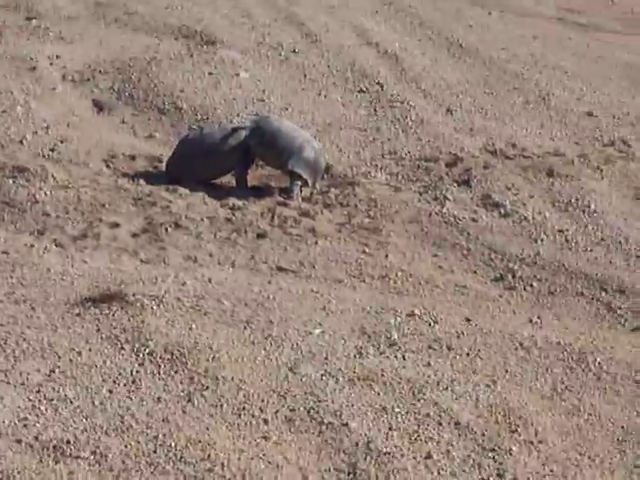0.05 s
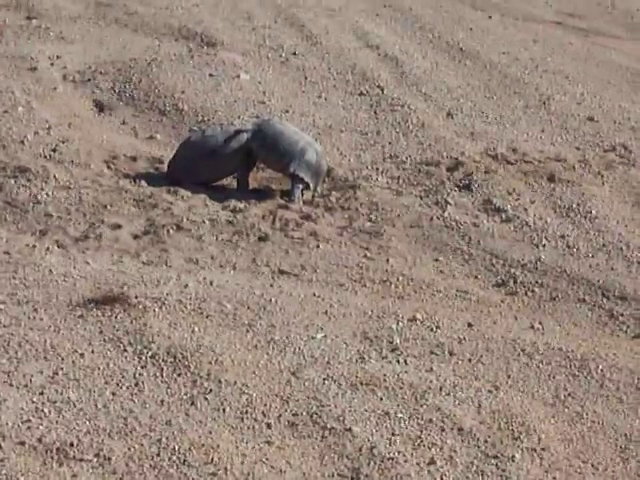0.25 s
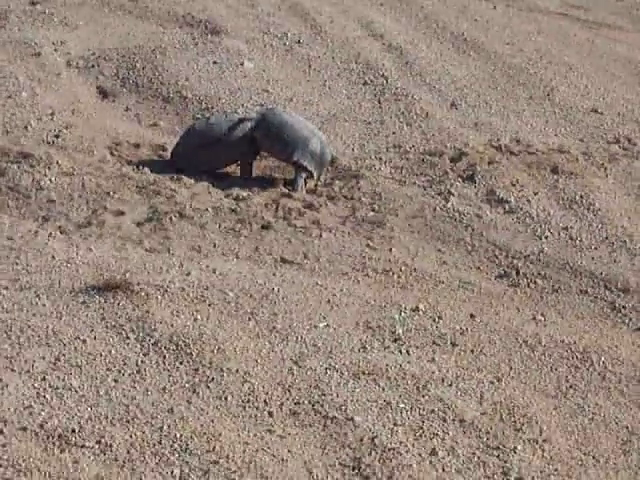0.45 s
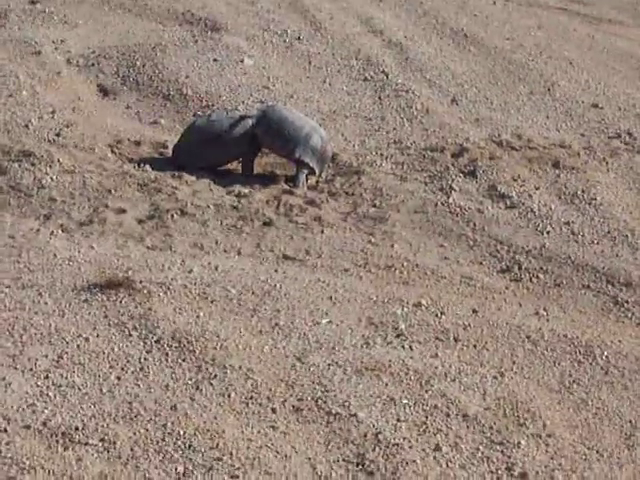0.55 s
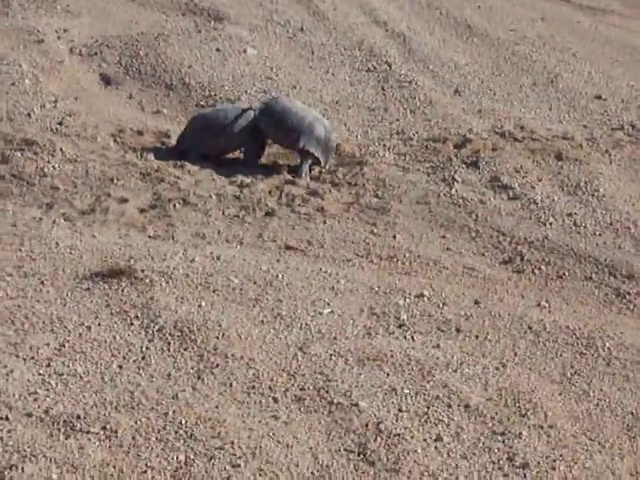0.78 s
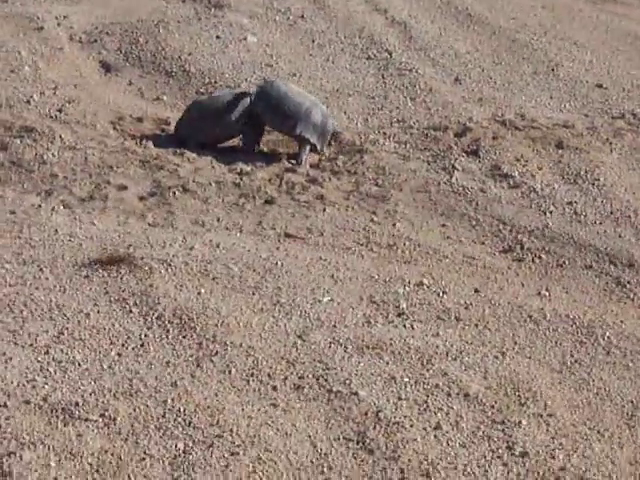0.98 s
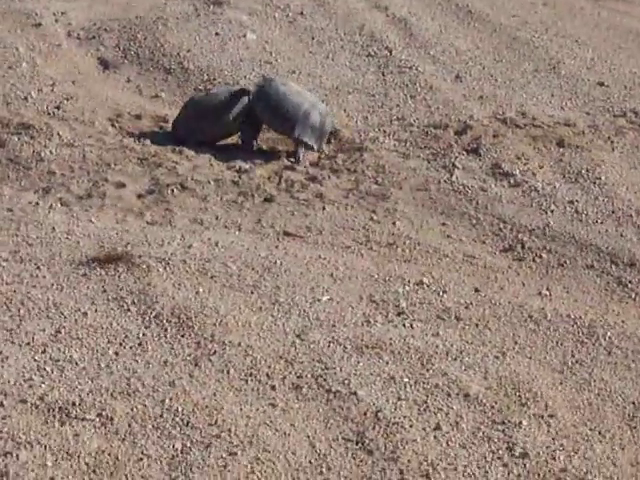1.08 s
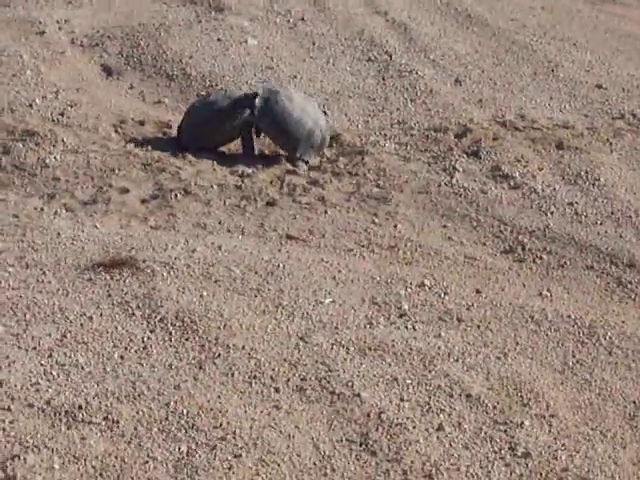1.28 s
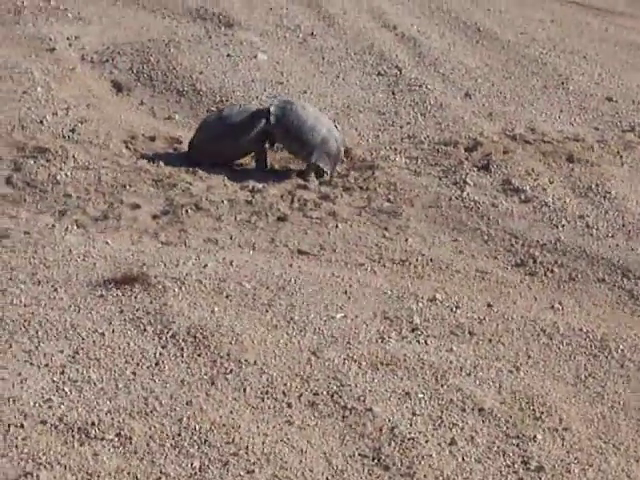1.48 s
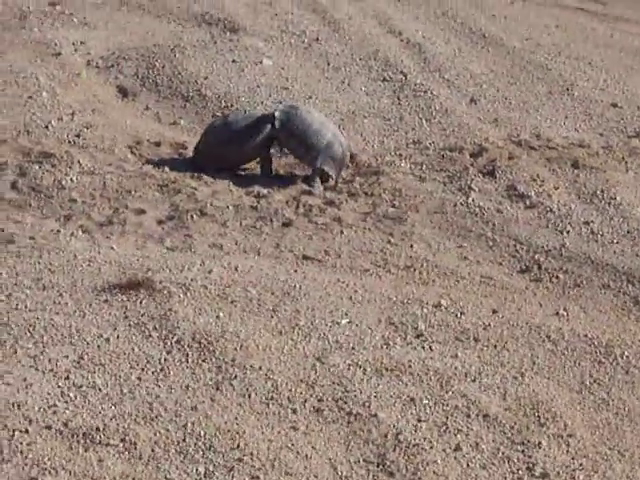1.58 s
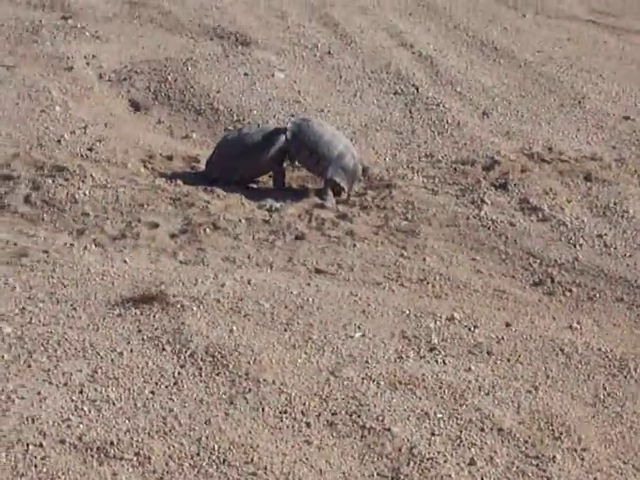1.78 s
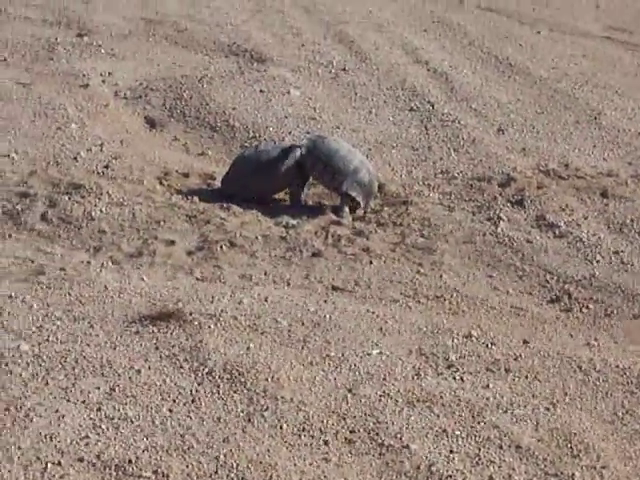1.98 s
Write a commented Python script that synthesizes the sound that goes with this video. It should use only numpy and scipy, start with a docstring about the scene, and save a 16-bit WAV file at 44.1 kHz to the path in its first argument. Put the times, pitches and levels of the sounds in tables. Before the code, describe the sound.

Gusty wind rumbles and thumps over faint scrapes of two tortoises shoving each other.

```python
"""On a patch of gravel in the wind, two tortoises shove each other. Their feet make soft, gritty scuffs,
pebbles knock and grit ticks. Then comes a quick run of dry, hollow scrapes as hard surfaces catch and slide.
Gusts buffet the microphone, and single eddies (small swirls of air) thump through the strongest, one with a
sharp crack. Under it lie a thin hiss and the camera's faint whine."""
import sys
import numpy as np
from scipy import signal
from scipy.fft import rfft, irfft, next_fast_len
from scipy.io import wavfile
from scipy.ndimage import uniform_filter1d

SR = 44100
rng = np.random.default_rng(int(sys.argv[2]) if len(sys.argv) > 2 else 0)


def wrap_up_sound(samples):
    """Save the sound to the file named by the first command line argument, as 16-bit audio."""
    columns = np.atleast_2d(samples).T
    # keep every value between -1 and 1, then stretch to whole-number steps
    tamed = np.clip(columns, -1, 1)
    steps = np.round(tamed * 32767).astype(np.int16)
    wavfile.write(sys.argv[1], SR, steps)


N = 90404
FFT_SIZE = next_fast_len(N + SR // 2)


def amp(db):
    """Turn decibels into a number to multiply by."""
    return 10 ** (np.asarray(db) / 20)


def unit(x):
    """Scale a sound to an average (rms) level of 1."""
    return x / np.sqrt(np.mean(x ** 2) + 1e-20)


def clock():
    """The time of each sample, in seconds."""
    return np.arange(N) / SR


def loudness(rows):
    """Join (time_s, level_db) points into a volume curve."""
    return amp(np.interp(clock(), *np.transpose(rows)))


def filtered(x, gain_at):
    """Turn each frequency up or down by gain_at(hz)."""
    hz = np.fft.rfftfreq(FFT_SIZE, 1 / SR)
    return irfft(rfft(x, FFT_SIZE) * gain_at(hz), FFT_SIZE)[:N]


def coloured(x, tone):
    """Give a sound the tone of a (pitch_hz, level_db) table, at level 1."""
    pitch_hz, level_db = np.transpose(tone)
    return unit(filtered(x, lambda hz: amp(np.interp(np.log(hz + 1), np.log(pitch_hz + 1), level_db))))


def noise(tone):
    """Noise with the given tone, at level 1."""
    return coloured(rng.standard_normal(N), tone)


def steady(x, samples):
    """Even out swells that last longer than about this many samples."""
    power = np.abs(signal.hilbert(x)) ** 2
    slow_power = uniform_filter1d(uniform_filter1d(power, samples), samples)
    return unit(x / np.sqrt(np.abs(slow_power) + 1e-9))


def grains(per_s, scatter_db):
    """Tiny hits at random times and of random sizes."""
    hits = rng.random(N) < per_s / SR
    direction = np.sign(rng.standard_normal(N))
    return unit(hits * direction * amp(scatter_db * rng.standard_normal(N)))


def clicks(events, tone, decay_s):
    """Bursts of noise that start sharply and die at once."""
    t = clock()
    strength = sum(amp(db) * (t >= s) * np.exp(-np.abs(t - s) / decay_s) for s, db in events)
    return strength * steady(noise(tone), samples=60)


# How loud the hiss is: time_s, level_db
HISS_LOUDNESS = [(0, -54.5), (0.35, -54.5), (0.6, -53.5), (0.85, -54.5), (0.96, -56.5), (1.15, -56),
                 (1.3, -56.5), (1.7, -57), (1.85, -56), (2.05, -56)]
# Tone of the hiss: pitch_hz, level_db
HISS_TONE = [(140, -52.5), (240, -7), (310, -2.5), (495, -7.5), (567, -9.5), (826, -13), (1000, -14),
             (1080, -15.5), (4820, -21.5), (7130, -20), (8800, -33.5), (11400, -77), (19400, -120)]
def background():
    """A thin hiss, and the camera whining on one high note."""
    whine_hz = 6903.2
    whine = amp(-64.5) * unit(np.sin(2 * np.pi * whine_hz * clock()))
    return loudness(HISS_LOUDNESS) * noise(HISS_TONE) + whine


# How loud the wind's deep rumble and higher flutter are: time_s, level_db
RUMBLE_LOUDNESS = [(0.0, -41), (0.06, -33.5), (0.09, -41), (0.23, -35.5), (0.27, -26.5), (0.32, -43.5),
                   (0.43, -19), (0.46, -29.5), (0.59, -24), (0.64, -36), (0.69, -20), (0.72, -42.5),
                   (0.81, -25.5), (0.93, -36.5), (1.0, -34), (1.07, -36.5), (1.22, -35.5), (1.36, -26.5),
                   (1.4, -56), (1.45, -27), (1.51, -23), (1.53, -19.5), (1.68, -36), (1.7, -21.5),
                   (1.75, -27), (1.8, -27), (1.82, -42), (2.05, -44.5)]
FLUTTER_LOUDNESS = [(0, -42.5), (0.05, -50.5), (0.13, -50.5), (0.27, -50.5), (0.3, -53.5), (0.39, -33.5),
                    (0.44, -29), (0.462, -72), (0.49, -21.5), (0.525, -42), (0.555, -33.5), (0.64, -29.5),
                    (0.66, -49.5), (0.695, -37.5), (0.725, -53), (0.782, -46.5), (0.803, -27.5),
                    (0.835, -27.5), (0.885, -59), (0.945, -43), (0.97, -55), (1.0, -20), (1.03, -36.5),
                    (1.06, -48), (1.19, -52), (1.27, -37.5), (1.35, -30), (1.4, -50.5), (1.435, -28.5),
                    (1.51, -25.5), (1.57, -26.5), (1.635, -32.5), (1.678, -53.5), (1.7, -20), (1.745, -30),
                    (1.795, -41), (1.84, -53), (2.05, -53)]
# Tones of the wind's three parts: pitch_hz, level_db
RUMBLE_TONE = [(8, -11), (22, 0), (48, 4.5), (85, 0.5), (120, -15.5), (180, -29.5), (400, -78.5),
               (900, -120)]
FLUTTER_TONE = [(50, -16), (100, 5), (140, 7), (220, -3.5), (300, -17.5), (420, -23.5), (600, -40),
                (1000, -61.5), (2500, -110)]
FIZZ_TONE = [(300, -8.5), (1000, 0.5), (4000, 1.5), (7300, -4.5), (9000, -4)]
def wind():
    """Gusts rumble and flutter on the microphone; each strong swing of air pressure fizzes."""
    rumble = loudness(RUMBLE_LOUDNESS) * steady(noise(RUMBLE_TONE), samples=1100)
    flutter = loudness(FLUTTER_LOUDNESS) * steady(noise(FLUTTER_TONE), samples=700)
    pressure = rumble + flutter + eddies()
    fizz = amp(-62) * unit(np.abs(pressure) ** 1.05) * noise(FIZZ_TONE)
    return pressure + fizz


# Pushes of a foot: peak_s, rise_s, fall_s, level_db
FOOT_PUSHES = [(0.064, 0.024, 0.008, -49), (0.082, 0.0035, 0.0087, -50), (0.229, 0.006, 0.014, -46),
               (0.262, 0.026, 0.012, -46.5), (0.287, 0.0079, 0.029, -48.5)]
# Tone of shifting gravel: pitch_hz, level_db
GRAVEL_TONE = [(200, -4), (600, -7.5), (1000, -1), (1400, -7), (2000, -3), (2900, -7), (4000, -9.5),
               (5500, -17.5), (7500, -16.5), (9000, -21)]
def scuffs():
    """A foot pushes through gravel: a crowd of tiny hits swells and dies away."""
    t = clock()
    push = sum(amp(level_db) * np.exp(-np.maximum((peak_s - t) / rise_s, (t - peak_s) / fall_s))
               for peak_s, rise_s, fall_s, level_db in FOOT_PUSHES)
    return push * coloured(grains(per_s=2800, scatter_db=5), GRAVEL_TONE)


# Knocks between pebbles: start_s, level_db
PEBBLE_KNOCKS = [(0.081, -43.5), (0.1135, -42), (0.1215, -46), (0.137, -41), (0.185, -46.5)]
# Tone of a knock: pitch_hz, level_db
PEBBLE_TONE = [(400, -18), (1100, -8), (1500, -23.5), (2100, 3), (2600, -20), (3300, -19), (5000, -21.5),
               (9000, -36.5)]
def pebbles():
    """Pebbles knock together with short, stony clicks."""
    return clicks(PEBBLE_KNOCKS, PEBBLE_TONE, decay_s=0.0028)


# Swirls of air hitting the microphone: peak_s, level_db, width_ms
EDDY_HITS = [(0.188, -25.5, 2), (0.55, -16.5, 2.3), (0.569, -15, 1.48), (0.597, -13, 2.7),
             (0.687, -20.5, 1.37), (0.834, -15.5, 1.9), (0.838, -21, 1.3), (1.031, -19.5, 4.8),
             (1.34, -12, 2.2), (1.351, -14.5, 3.3), (1.374, -24.5, 1.6), (1.4425, -16, 1.48),
             (1.477, -15.5, 0.8), (1.48, -18, 1.3), (1.506, -16, 1.5), (1.5186, -20, 0.72),
             (1.5373, -7.5, 1.7), (1.538, -16, 0.71), (1.571, -22.5, 1.7), (1.597, -11.5, 1.8),
             (1.631, -10.5, 2.15), (1.654, -13.5, 1.49), (1.701, -12, 1.44), (1.711, -14.5, 1.8),
             (1.732, -14, 2.2), (1.745, -17, 1.4), (1.754, -14, 1.0), (1.7688, -18, 0.6), (1.795, -19, 1.9)]
def eddies():
    """Each eddy thumps with one smooth swing of pressure; narrow ones sound brighter."""
    pressure = np.zeros(N)
    for peak_s, level_db, width_ms in EDDY_HITS:
        offset = (clock() - peak_s) / (width_ms / 1000)
        pressure += amp(level_db) * (1 - offset ** 2) / (1 + offset ** 2) ** 2
    muffle_above_hz = 1150
    return filtered(pressure, lambda hz: 1 / np.sqrt(1 + (hz / muffle_above_hz) ** 10))


# Sharp ticks: start_s, level_db; the one at 1.5378 s is the crack of the strongest eddy, the rest are grit
SHARP_TICKS = [(0.2598, -34), (0.884, -38.5), (1.529, -39), (1.5378, -31), (1.548, -42)]
# Tone of a tick: pitch_hz, level_db
GRIT_TONE = [(300, -5), (900, 7), (1500, 4), (2800, -15.5), (4500, 4), (6500, -0.5), (9000, -39)]
def ticks():
    """Very short, sharp ticks: bits of grit touch, and the strongest eddy cracks at 1.538 s."""
    return clicks(SHARP_TICKS, GRIT_TONE, decay_s=0.00081)


# Notes of the hollow body, shared by all scrapes: pitch_hz, width_hz, level_db
BODY_RINGS = [(1044, 25, 1), (1490, 28, -3), (1860, 110, 4), (2046, 34, 1.5), (2316, 320, -4.5),
              (2815, 130, -1.5), (3400, 90, -18), (4760, 760, -6.5), (5900, 170, -7), (6400, 300, -30)]
# Scrapes: start_s, length_s, level_db, fade_db, brightness_db_per_octave, low_ring_hz, middle_ring_hz
SCRAPE_STROKES = [(0.8952, 0.0069, -31.5, 8.5, -5, 528, 1320), (0.906, 0.017, -44.5, 4.5, -5.5, 505, 1280),
                  (0.9869, 0.0075, -35, 2.5, -6.5, 391, 1200), (0.994, 0.008, -46, -6, -3, 400, 1260),
                  (1.019, 0.025, -42.5, -1, -6, 370, 1254), (1.0548, 0.02, -39, 3.5, -5, 394, 1205),
                  (1.0866, 0.022, -39, 3.5, -4.5, 414, 1250), (1.1648, 0.011, -36.5, 5, -5, 496, 1400),
                  (1.176, 0.032, -46.5, 8.5, -8, 520, 1340), (1.204, 0.0021, -46.5, -2, -1.5, 500, 1400)]
def scrapes():
    """Hard surfaces catch and slide: tiny slips ring a hollow body; two notes shift with each contact."""
    attack_s, release_s, cut_below_hz = 0.0015, 0.001, 1113
    t, out = clock(), np.zeros(N)
    hz = np.fft.rfftfreq(FFT_SIZE, 1 / SR)

    def ring(pitch_hz, width_hz, db):
        """A filter for one ringing note; narrow ones ring longer."""
        return amp(db) * 1j * hz * width_hz / (pitch_hz ** 2 - hz ** 2 + 1j * hz * width_hz)

    body = sum(ring(*note) for note in BODY_RINGS)
    bass_cut = signal.freqs(*signal.butter(4, cut_below_hz, "high", analog=True), hz)[1]
    slips = steady(grains(per_s=2600, scatter_db=4), samples=130)
    for start_s, length_s, level_db, fade_db, brightness, low_hz, middle_hz in SCRAPE_STROKES:
        age_s = t - start_s
        press = np.clip(age_s / attack_s, 0, 1)
        let_go = np.exp(-np.maximum(age_s - length_s, 0) / release_s)
        force = press * let_go * amp(level_db - fade_db * np.clip(age_s / length_s, 0, 1))
        low_ring = ring(low_hz, width_hz=23, db=-6.5)
        middle_ring = ring(middle_hz, width_hz=185, db=3.5)
        shell = bass_cut * (body + middle_ring) + low_ring
        tone = shell * amp(brightness * np.log2(hz + 1))
        scrape = unit(filtered(slips * force, lambda _: tone))
        out += scrape * np.sqrt(np.mean(force ** 2))  # the force alone sets the level
    return out


def scene():
    """Tortoises, wind and background together in one channel."""
    tortoises = scrapes() + scuffs() + pebbles() + ticks()
    return (tortoises + wind() + background())[None]


def record(dry):
    """The camera loses the highest treble."""
    fade_above_hz, silent_above_hz = 8040, 9012
    return filtered(dry[0], lambda hz: (hz < silent_above_hz) / np.sqrt(1 + (hz / fade_above_hz) ** 50))[None]


dry = scene()
out = record(dry)
wrap_up_sound(out)
```